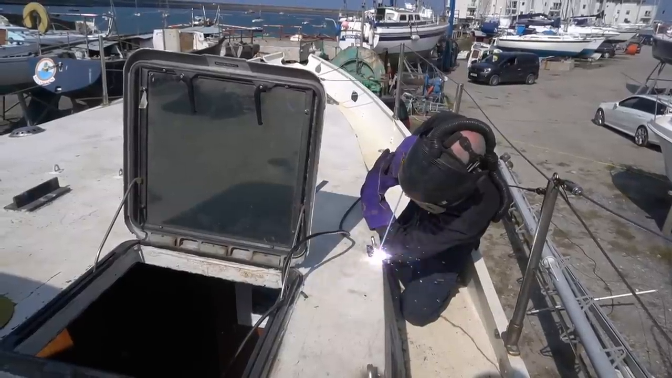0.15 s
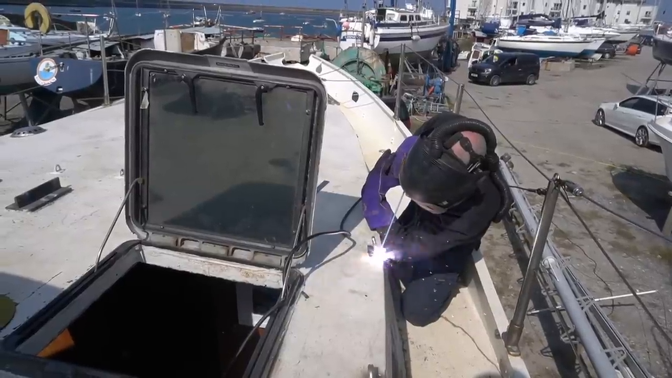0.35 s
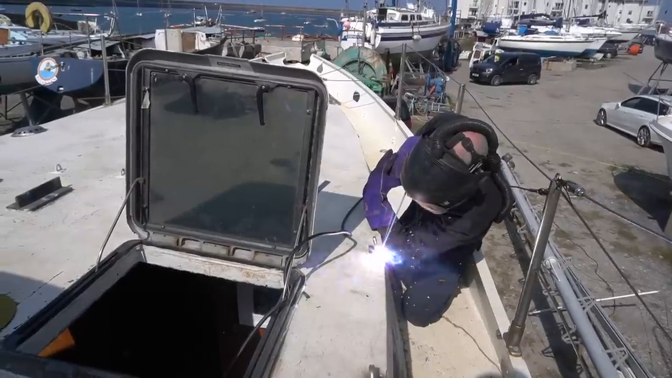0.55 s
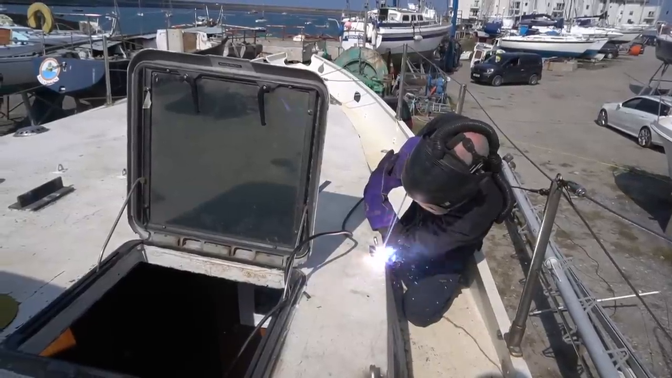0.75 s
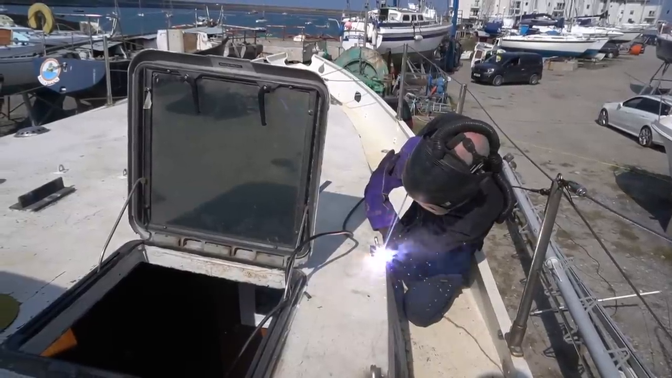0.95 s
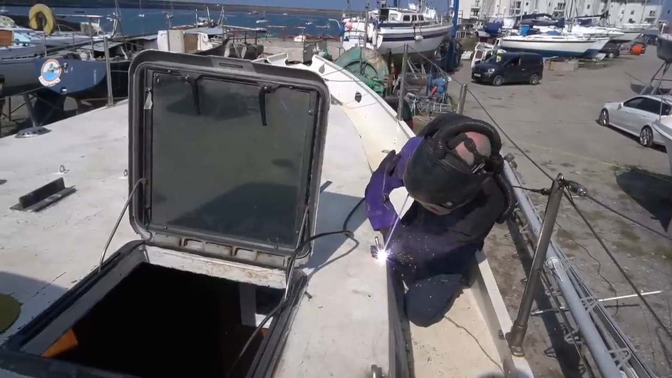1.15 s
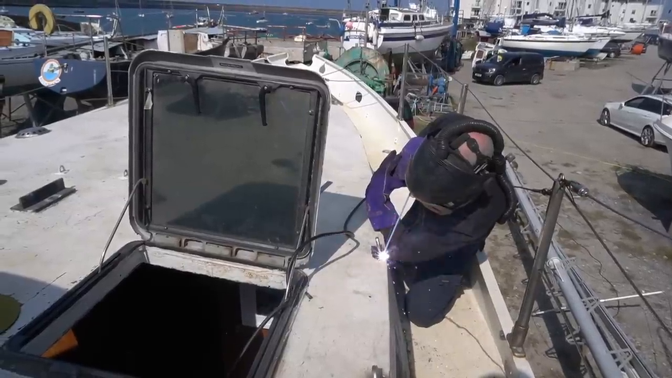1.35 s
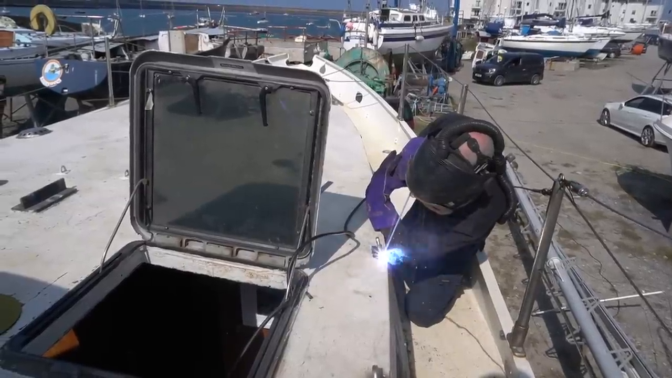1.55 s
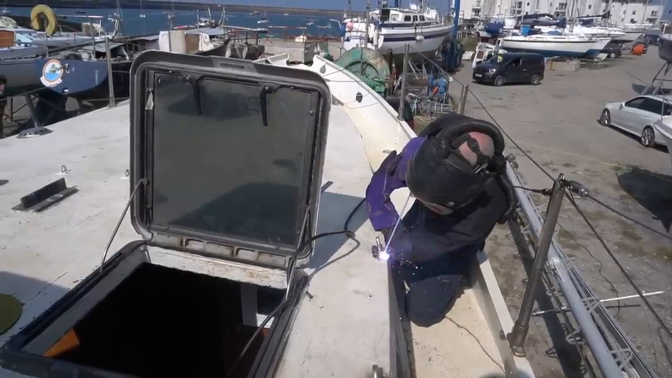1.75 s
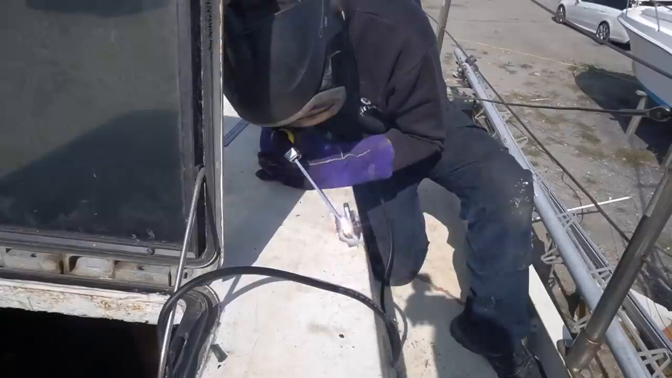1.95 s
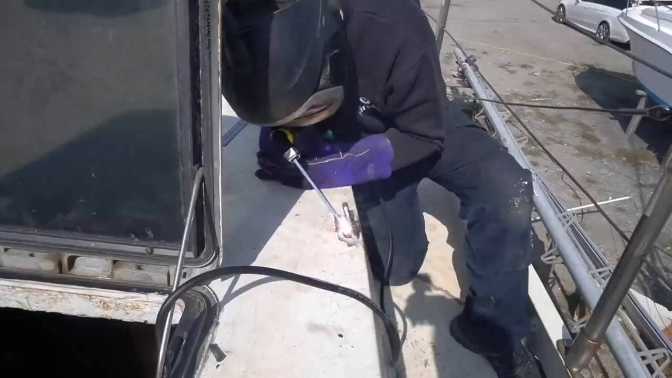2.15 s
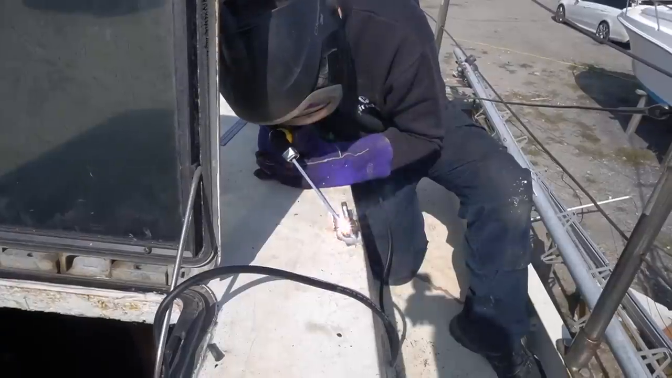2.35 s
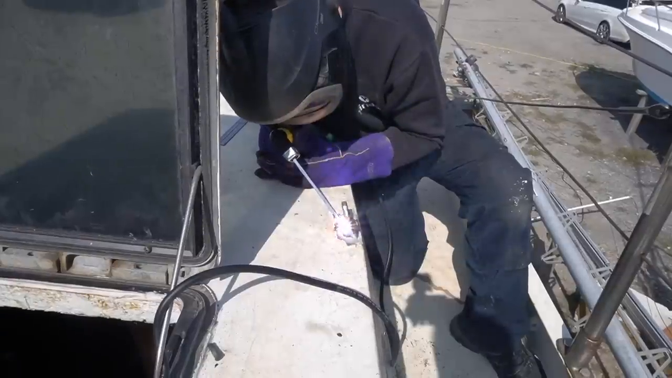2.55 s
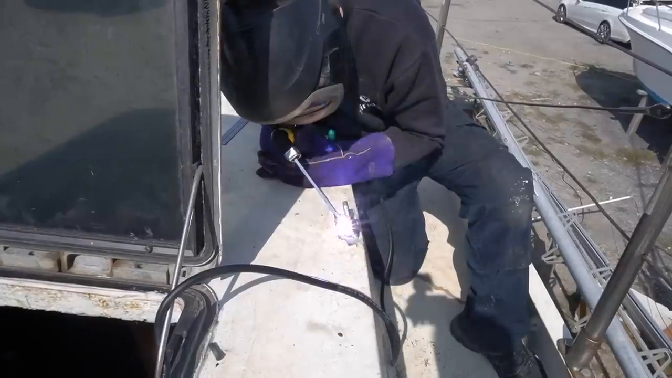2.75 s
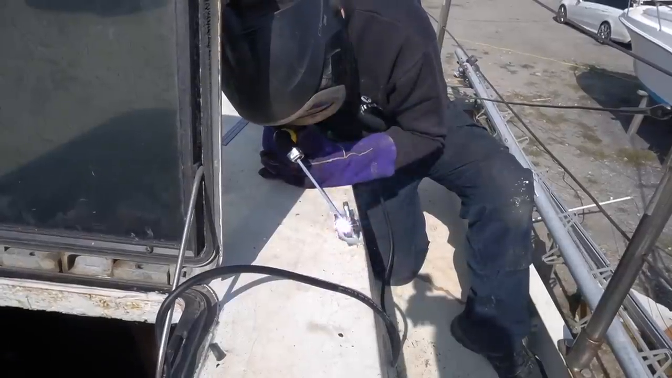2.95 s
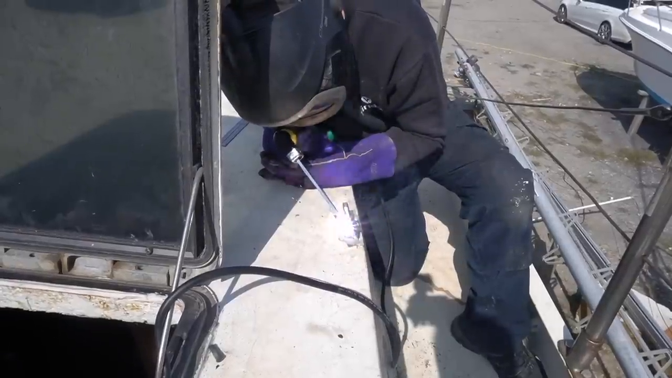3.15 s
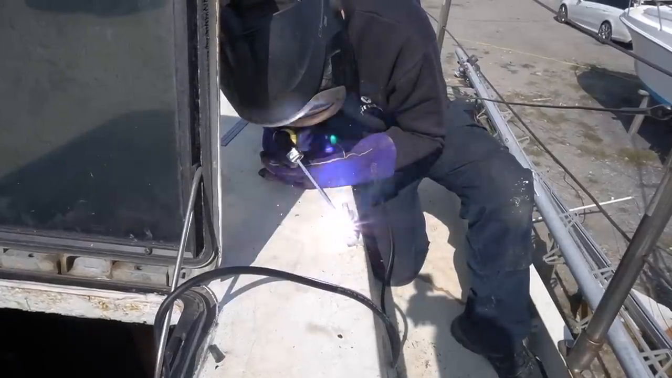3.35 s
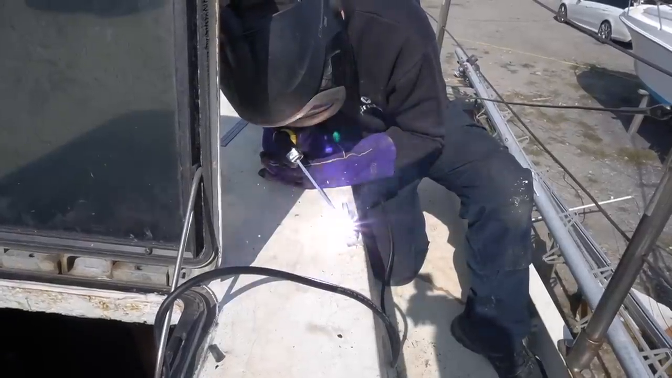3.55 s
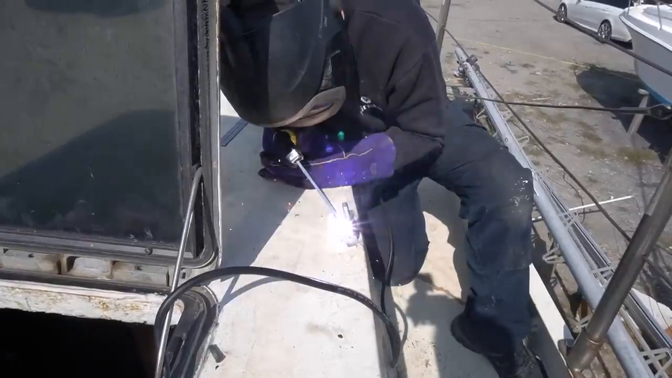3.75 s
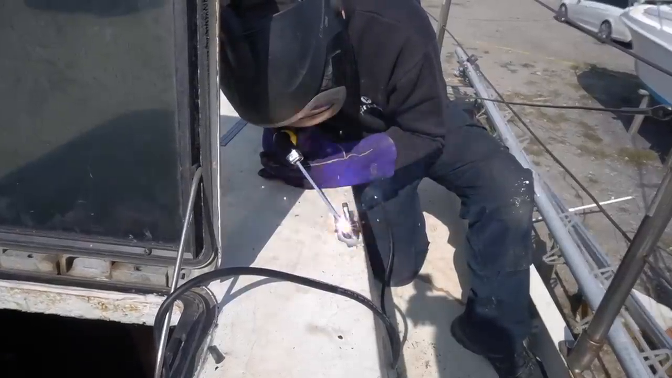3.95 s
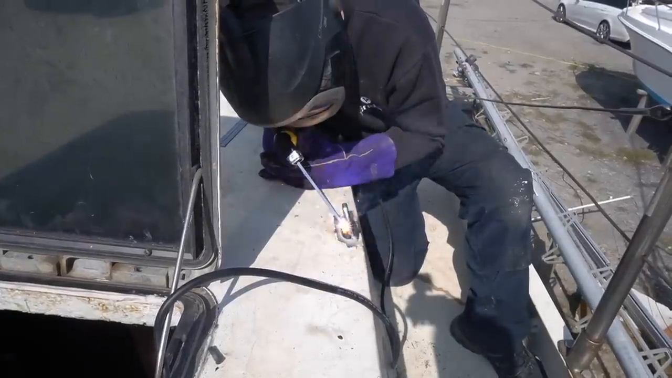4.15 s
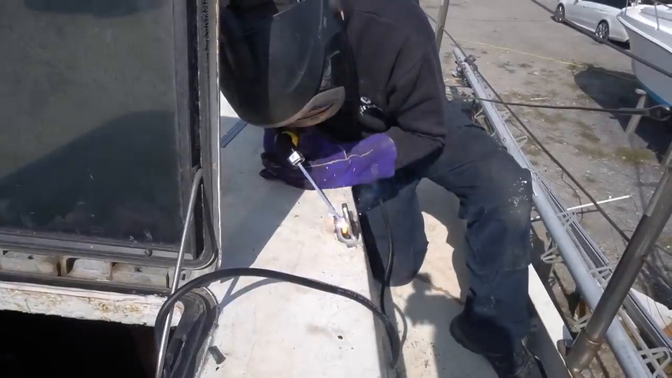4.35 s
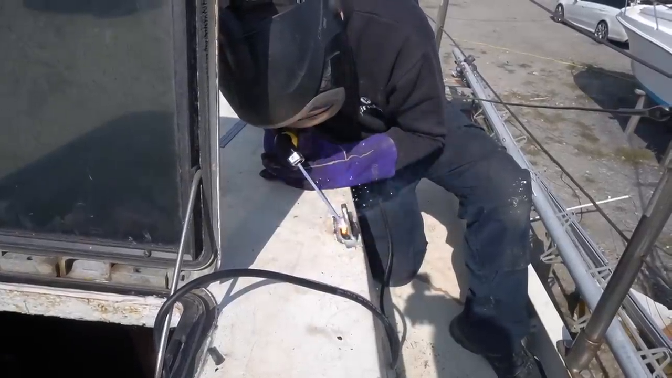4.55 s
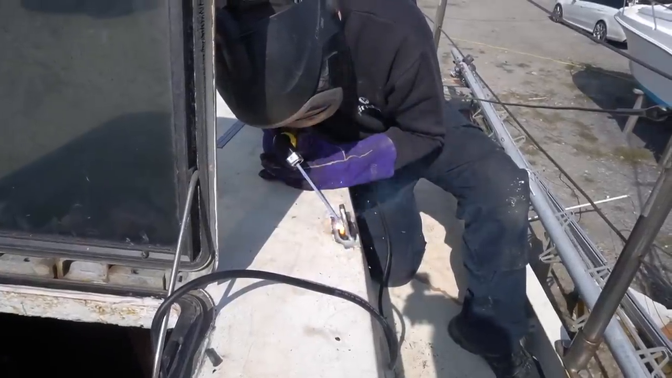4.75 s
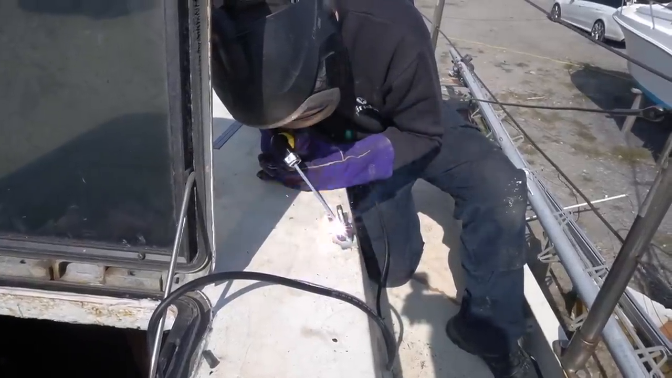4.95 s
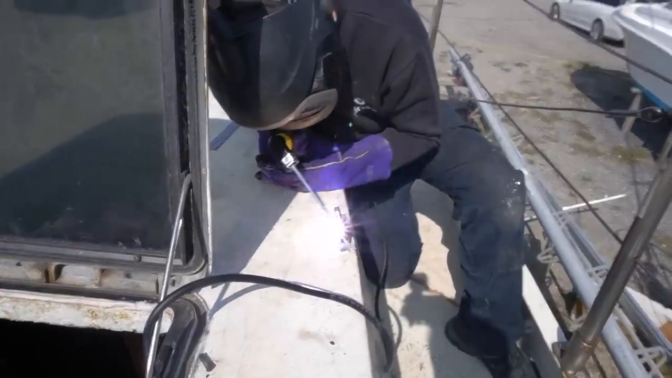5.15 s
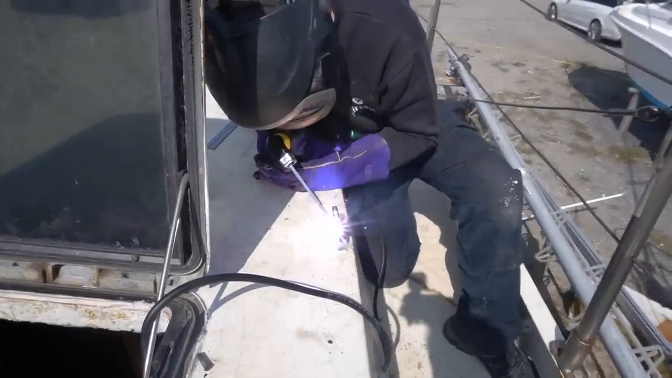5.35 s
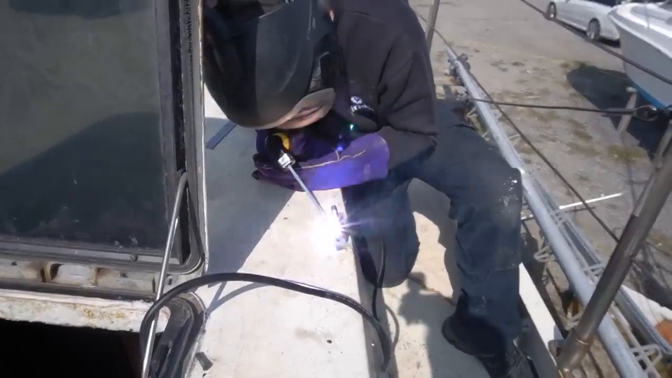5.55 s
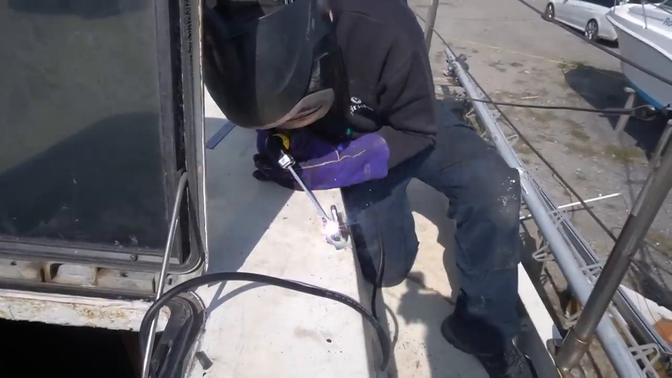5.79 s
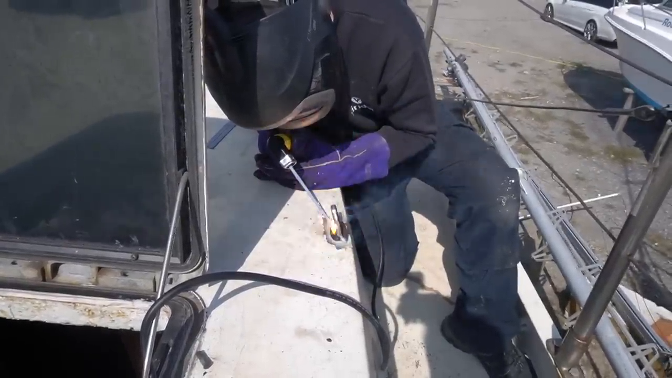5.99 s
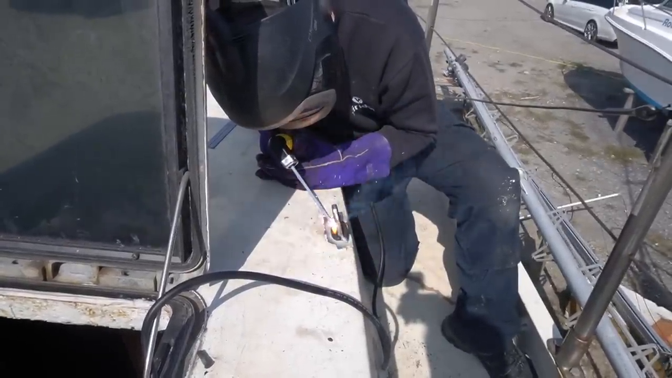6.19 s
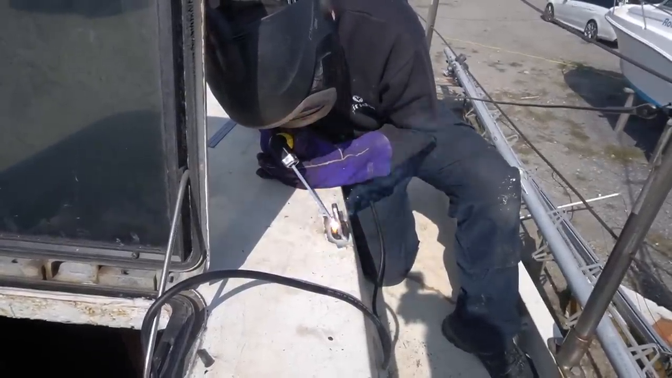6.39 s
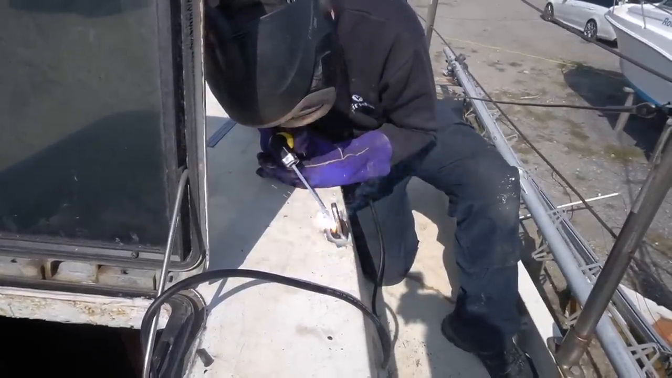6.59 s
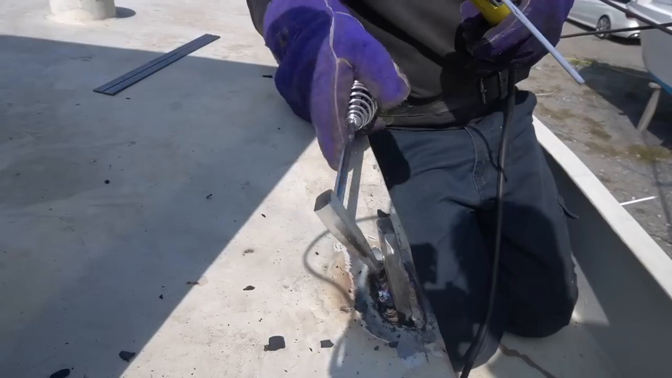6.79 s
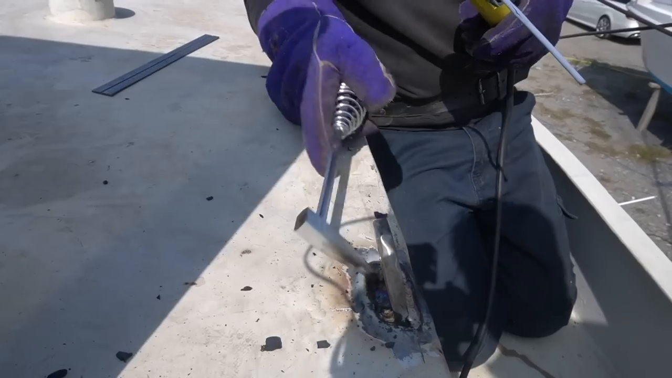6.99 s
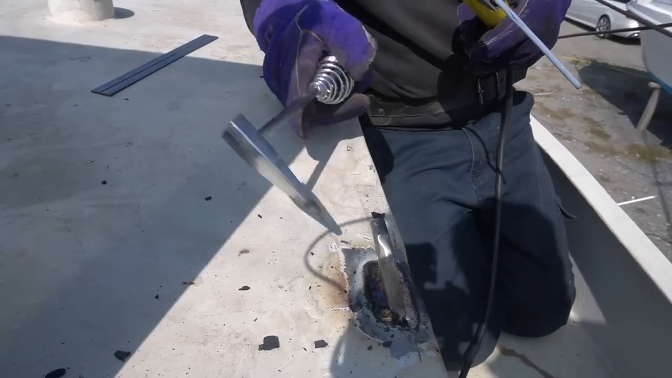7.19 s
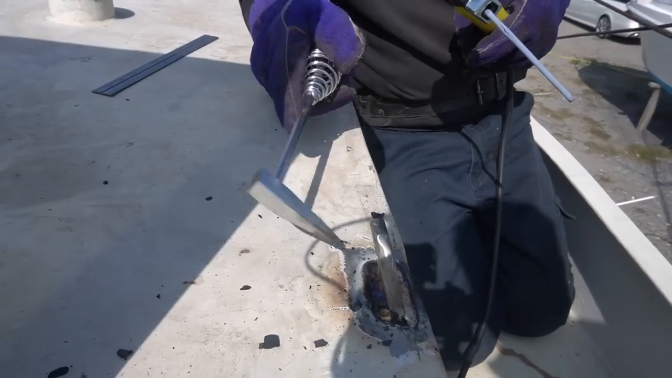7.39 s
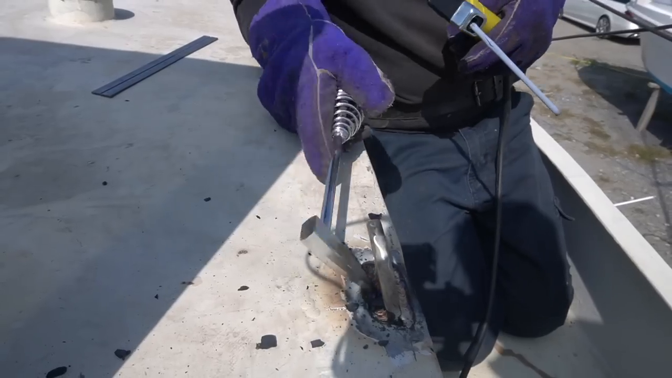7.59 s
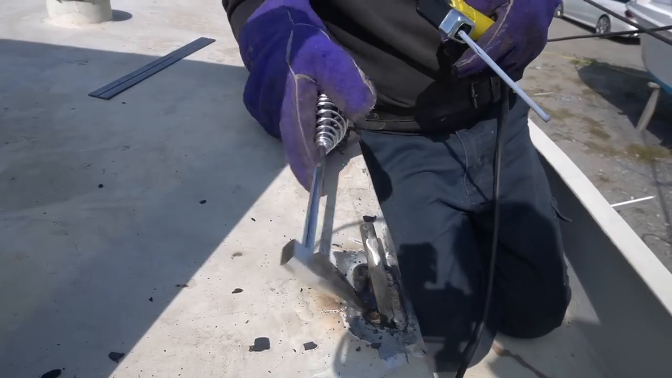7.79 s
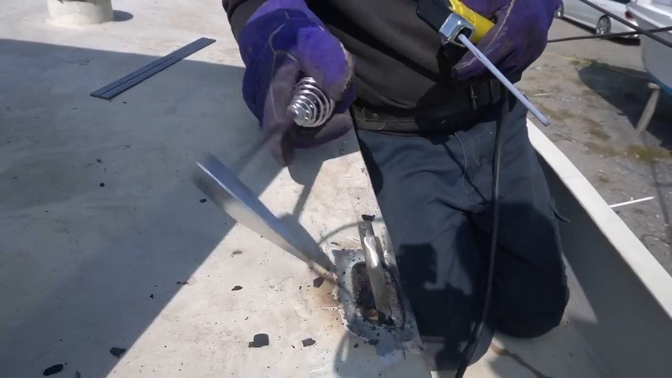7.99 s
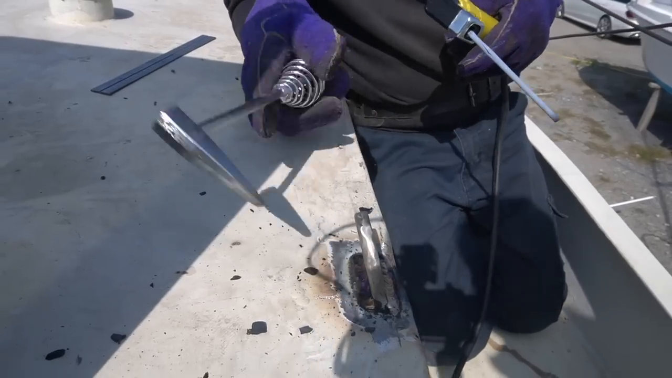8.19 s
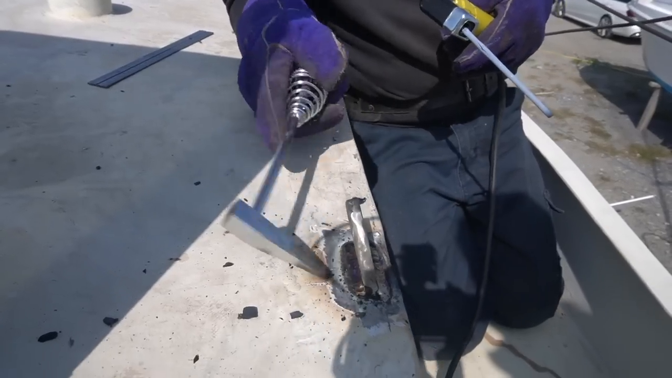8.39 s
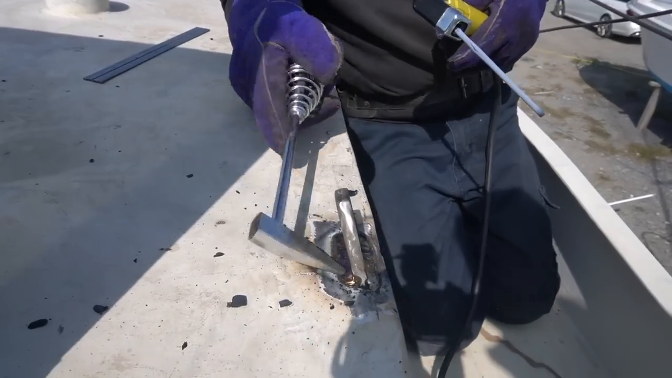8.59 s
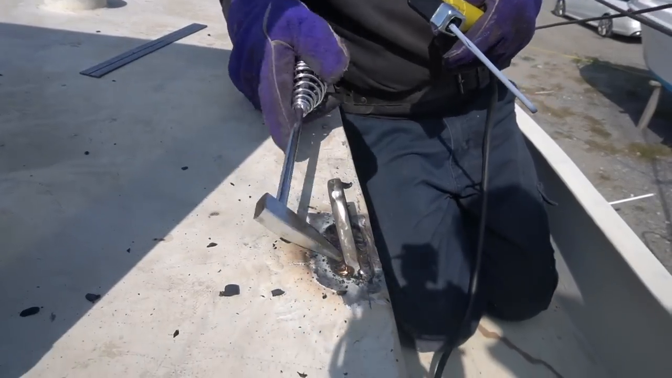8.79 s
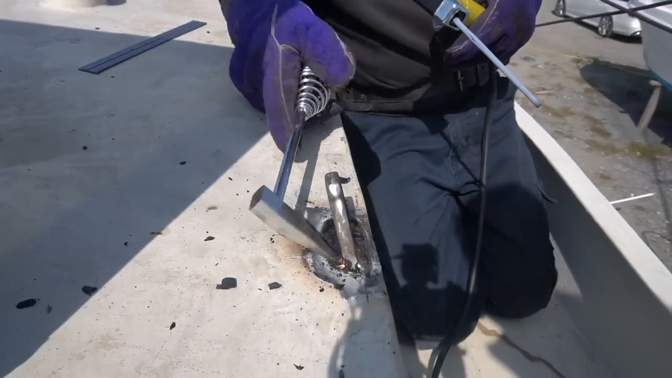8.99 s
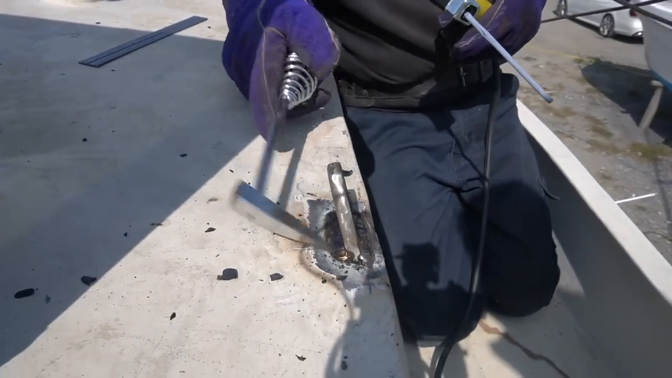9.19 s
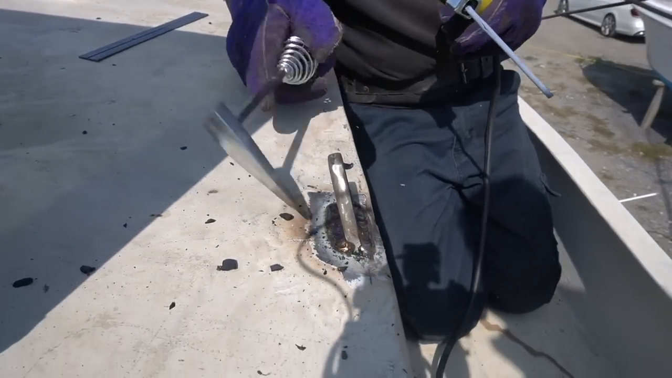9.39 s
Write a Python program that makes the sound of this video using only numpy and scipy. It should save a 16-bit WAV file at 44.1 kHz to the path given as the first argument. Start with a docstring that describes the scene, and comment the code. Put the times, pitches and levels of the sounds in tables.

```python
"""A boatyard: a steel eye is stick-welded to a deck, heard from a few steps away in a breeze, then close by.
The arc fries as noise and random sparks, spits short noise bursts and puffs gas over the fan's wavering tones.
Then a chipping hammer knocks the slag off: noise crashes, and decaying noise bands and sines boom as the deck.
Slag ticks and patters and the pick rings between the blows.
The work lies to the right of two spaced microphones, whose input rounds off the loudest peaks."""
import sys
import numpy as np
from scipy import signal
from scipy.fft import rfft, irfft
from scipy.io import wavfile
from scipy.ndimage import uniform_filter1d

SR = 44100
rng = np.random.default_rng(int(sys.argv[2]) if len(sys.argv) > 2 else 0)


def put_to_file(sound):
    """Save the sound as 16-bit audio at rate SR, in the file named by the first command-line argument."""
    columns = np.atleast_2d(sound).T  # one column per channel
    safe = np.clip(columns, -1, 1)
    whole_steps = np.round(safe * 32767)
    wavfile.write(sys.argv[1], SR, whole_steps.astype(np.int16))


N = 416304
TIME = np.arange(N) / SR
# the scene changes from the far place to the near one; the welding stops (s)
NEAR_S, ARC_END_S = 1.86, 6.712

# Strength of the arc as the hand feeds the rod; it dips where the rod nearly sticks.
# Each row: time in seconds, relative level in dB.
ARC_STRENGTH = [(0.0, -28), (0.27, -26), (0.34, -32), (0.41, -25), (0.5, -28), (0.94, -24), (0.99, -27.4),
                (1.37, -27), (1.55, -30.5), (1.6, -26.5), (1.86, -33.5), (1.9, -29.5), (2.44, -29),
                (3.34, -30), (3.43, -22), (3.5, -26), (3.55, -23), (3.81, -29.5), (4.39, -28.5),
                (4.44, -30), (4.55, -27.1), (4.6, -32), (4.76, -26), (4.85, -31.5), (5.01, -24.5),
                (5.06, -28.5), (5.38, -28.5), (5.47, -25.5), (5.52, -33), (5.59, -25), (5.86, -30.5),
                (6.67, -28.5)]
# The biggest drops of metal, which short the arc and burst. Each row: time in seconds, relative energy in dB.
BIG_DROPS = [(0.1357, 7.5), (0.1999, 7.5), (0.3028, 11.5), (0.4721, 6), (0.594, 7), (0.693, 8), (0.7042, 6),
             (0.724, 2), (1.0554, 7), (1.426, 9), (1.437, 9.5), (1.6137, 3), (1.779, 9), (1.804, 7),
             (1.884, 12.5), (2.1768, 5.5), (2.3898, 6), (2.491, 3), (2.6807, 8.5), (3.0265, 6.5),
             (3.0372, 9), (3.197, 13), (3.2703, 8), (3.2818, 12.5), (3.3016, 10), (3.5653, 9.5),
             (3.6354, -3), (3.6488, 6), (3.9697, 9.5), (4.2594, 11.5), (4.442, 8.5), (4.5336, 7),
             (4.6543, 9.5), (4.6666, 9.5), (4.8518, 8), (5.0306, 13), (5.2056, 10.5), (5.3402, 6),
             (5.4867, 9.5), (5.8463, 6), (5.9409, 5), (6.0727, 11.5), (6.5208, 5), (6.609, 5), (6.6497, 6)]
# Hammer blows, the first a soft knock on the deck. Each row: start in seconds, boom gain in dB,
# clank gain in dB, clash gain in dB, pitch of the struck spot in Hz.
BLOWS = [(6.708, -9.5, -27, -25, 3400), (6.8273, 5, 8, 7.5, 3400), (7.06, 2.5, 4.5, 3, 3430),
         (7.297, 0.5, 4.5, 5, 4050), (7.6371, -5, -3.5, -4.5, 3290), (7.853, -5, 0.5, 0, 4000),
         (8.091, -0.5, 1, -4.5, 4430), (8.3398, 0.5, 4, 3.5, 2580), (8.571, -2.5, -3, -6.5, 2990),
         (8.7982, -1.5, -1, -5, 3180), (9.031, -2, 1, -0.5, 4080), (9.2624, -0.5, 2, 4, 4280)]


def from_db(db):
    """Decibels to amplitude."""
    return 10 ** (np.asarray(db) / 20)


def rms_one(x):
    """Scale to rms 1."""
    return x / np.sqrt(np.mean(x ** 2) + 1e-20)


def in_time(rows):
    """Rows of (s, value) as a curve over the whole scene."""
    return np.interp(TIME, *np.transpose(rows))


def at_hz(points, hz):
    """Each column of a spectrum, read on a log-frequency axis."""
    knots, *columns = np.transpose(points)
    return np.array([np.interp(np.log(hz + 1e-9), np.log(knots), c) for c in columns])


def between(start, end):
    """A gate with 6 ms ramps."""
    opening = np.clip((TIME - start) / .006, 0, 1)
    closing = np.clip((end - TIME) / .006, 0, 1)
    return opening * closing


def drift(rate_hz):
    """Smooth chance with spread 1: noise through a two-pole lowpass, made at a twentieth of the sample rate."""
    pole = np.exp(-40 * np.pi * rate_hz / SR)
    raw = rng.standard_normal(N // 20 + 2002)
    # the filter's first 2000 steps are left out while it settles
    slow = signal.lfilter([1], [1, -2 * pole, pole * pole], raw)[2000:]
    return np.interp(np.arange(N) / 20, np.arange(len(slow)), rms_one(slow))


def noise(spectrum, size):
    """Coloured stereo noise, independent left and right, rms 1 overall."""
    hz = np.fft.rfftfreq(size, 1 / SR)
    white = rfft(rng.standard_normal((2, size)))
    return rms_one(irfft(white * from_db(at_hz(spectrum, hz)), size))


def band(x, low_hz, high_hz):
    """Keep a band of frequencies."""
    return signal.sosfilt(signal.butter(2, [low_hz, high_hz], "band", fs=SR, output="sos"), x)


def colour(x, spectrum, weight=0.97, size=1024):
    """A causal (minimum-phase) filter with the given spectrum times a weight."""
    gain = weight * from_db(at_hz(spectrum, np.fft.rfftfreq(size, 1 / SR)))
    # folding the cepstrum onto positive time gives minimum phase
    cepstrum = irfft(np.log(gain))
    cepstrum[:, 1:size // 2] *= 2
    cepstrum[:, size // 2 + 1:] = 0
    response = irfft(np.exp(rfft(cepstrum)))
    return signal.oaconvolve(x, response, axes=1)[:, :x.shape[1]]


def left_late(x, lag_ms):
    """Sound from the right reaches the left microphone later."""
    lag = round(lag_ms * SR / 1000)
    return np.array([np.pad(x[0], (lag, 0))[:x.shape[1]], x[1]])


def add(out, sound, s):
    """Mix a sound in at s seconds."""
    at = round(s * SR)
    out[:, at:at + sound.shape[1]] += sound[:, :N - at]


def clicks(rows):
    """One-sample impulses from rows of (s, level dB)."""
    out = np.zeros(N)
    for s, db in rows:
        out[round(s * SR)] += from_db(db)
    return out


def bursts(rows, t60, snap_db, swell_ms, spread=0.45, size=4000):
    """Each burst swells, snaps, and spits for a time of its own; right-channel energy as in the rows."""
    t = np.arange(size) / SR - .01
    out = np.zeros((2, N))
    snap = np.argmin(np.abs(t))
    for s, db in rows:
        swell_stretch, decay_stretch = np.exp(spread * rng.standard_normal(2))
        swell = np.exp(np.minimum(t, 0) * 1000 / (swell_ms * swell_stretch))
        decay = from_db(-60 * np.maximum(t, 0) / (t60 * decay_stretch))
        spit = rng.standard_normal((2, size)) * swell * decay
        spit /= np.linalg.norm(spit[1])
        # the snap is a single sample, its level varied by chance
        spit[:, snap] = from_db(snap_db + rng.normal(0, 3.3))
        add(out, from_db(db) * spit / np.linalg.norm(spit[1]), s + t[0])
    return out


def over_deck(x, spectrum, lag_ms, scatter_db, scatter_t60, echo_db, echo_t60, size=4096):
    """A snap arrives directly, with scatter from hatch, mask and deck and a longer echo tail."""
    t = np.arange(size) / SR
    path = np.zeros((2, size))
    path[:, 0] = 1
    for db, t60 in ((scatter_db, scatter_t60), (echo_db, echo_t60)):
        tail = rng.standard_normal((2, size)) * from_db(-60 * t / t60) * (1 - np.exp(-t / .0004))
        path += from_db(db) * tail / np.linalg.norm(tail, axis=1, keepdims=True)
    # reflections add only fine ripple; the broad colour is that of the spectrum
    broad = uniform_filter1d(np.abs(rfft(path)) ** 2, size=32, axis=1)[:, ::4]
    path = colour(path, spectrum, weight=broad ** -.5)
    path = left_late(path / np.linalg.norm(path[1]), lag_ms)
    return signal.oaconvolve(np.atleast_2d(x), path, axes=1)[:, :N]


def arc_level(wander_db=0.68):
    """The hand sets the level in dB, a little unsteadily; the arc flares as it strikes again at each big drop."""
    flare_db, attack_s, hold_s, release_s = 2, 0.0056, 0.017, 0.11
    # the rise ends at the moment of the burst
    corners_s = np.cumsum([-attack_s, attack_s, hold_s, release_s])
    flare = np.max([np.interp(TIME, s + corners_s, [0, 1, 1, 0]) for s, _ in BIG_DROPS], axis=0)
    return in_time(ARC_STRENGTH) + flare_db * flare + wander_db * drift(18)


def droplets(count=60, over_arc_db=29):
    """Small drops leave the rod at random, stronger with the arc: rows of (s, relative energy dB)."""
    s = .02 + rng.random(count) * (ARC_END_S - .02)
    return list(zip(s, np.interp(s, *np.transpose(ARC_STRENGTH)) + over_arc_db))


def frying(sparks_per_s=1100, size_db=4.5, sputter_db=2.5, flutter_db=1.22):
    """Tiny discharges fry over a hiss, both in spurts, while the length of the arc tilts their tone."""
    # A longer arc sounds throatier. Each row: time in seconds, dB added to the lows and taken from the highs.
    throat = [(0, -0.5), (0.65, 3.5), (1.1, 4.5), (1.33, -1.5), (1.8, -0.5), (2.33, 0), (2.95, -2.5),
              (3.7, 1.7), (3.85, -1.1), (4.8, -1.5), (5.5, 4.5), (5.75, -1), (6.7, 0.5)]
    spurts = rms_one(from_db(sputter_db * np.minimum(drift(96), 2)))
    burn = from_db(arc_level()) * spurts
    sizes = from_db(size_db * np.minimum(rng.exponential(1, N), 3.5)) * rng.choice([-1, 1], N)
    sparks = rms_one(sizes * (rng.random(N) < sparks_per_s / SR))
    # one hiss is common to both sides, a softer one differs left and right
    hiss = from_db(-4.0) * rng.standard_normal(N) + from_db(-7.0) * rng.standard_normal((2, N))
    fry = burn * (from_db(-3.0) * sparks + hiss)
    lows = signal.sosfilt(signal.butter(1, 4200, fs=SR, output="sos"), fry)
    tilt = from_db(in_time(throat) + flutter_db * drift(14))
    return lows * tilt + (fry - lows) / tilt


def arc(pop_db=-3.0, puff_db=37.5, eye_hz=3500, eye_db=-7.0):
    """Over the frying, drops burst and gas puffs from the pool; the eye resonates and the deck scatters it all."""
    # Dull puffs of gas from the pool. Each row: time in seconds, relative energy in dB.
    puffs = [(0.578, -24), (2.316, -27), (2.623, -25.5), (4.461, -27), (4.664, -21.5), (5.028, -22.5),
             (5.205, -28), (6.088, -22.5), (6.647, -20.5)]
    # Colour of the arc from the far and from the near place. Each row: frequency in Hz, left dB, right dB.
    far_colour = [(300, -15.5, -19.5), (940, -15, -17), (1320, -15, -12.5), (2110, -19, -12.5),
                  (2260, -16, -3.5), (3220, -10, -9.5), (3300, -11.5, -2.5), (4830, -13.5, -4.5),
                  (5830, -8.5, -7.5), (7400, -14, -3), (8330, -9, -1.5), (9460, -18, -9.5),
                  (10900, -14, -8.5), (14000, -55, -15.5), (15300, -30, -21)]
    near_colour = [(304, -19.5, -23), (910, -17.5, -13.5), (1405, -13, -15), (1920, -6, 0.5),
                   (2540, -14, -7), (2540, -0.5, -3), (3640, -27, -1), (3690, -8.5, -2), (5240, -6, -2),
                   (6260, -5.5, 0), (6500, -10, -10), (7130, -3.5, -1.5), (7780, -8.5, -6),
                   (10380, -13, -9.5), (13250, -19.5, -18), (16400, -41, -24.5)]
    big = bursts(BIG_DROPS, t60=0.006, snap_db=-1.5, swell_ms=0.42)
    small = bursts(droplets(), t60=0.009, snap_db=2.0, swell_ms=0.75)
    # a bursting drop is sharper than the frying
    pops = from_db(pop_db) * colour(big + small, [(1500, -3), (5000, 0), (13000, 3.5)])
    gas = from_db(puff_db) * band(bursts(puffs, t60=0.056, snap_db=-19.0, swell_ms=1.8), 310, 1360)
    source = frying() + pops + gas
    # the steel eye under the arc rings along
    source = source + from_db(eye_db) * signal.lfilter(*signal.iirpeak(eye_hz, 12.0, fs=SR), source)
    far = over_deck(source * between(0, NEAR_S), far_colour, lag_ms=1.347,
                    scatter_db=-7.5, scatter_t60=0.025, echo_db=-13.5, echo_t60=0.067)
    near = over_deck(source * between(NEAR_S, ARC_END_S), near_colour, lag_ms=1.995,
                     scatter_db=-4.5, scatter_t60=0.012, echo_db=-13.5, echo_t60=0.23)
    return from_db(1) * far + from_db(1.15) * near


def breeze(buffet_db=2.5):
    """Lumpy low rumble at the far place, easing off, with a few short low thumps and gusts."""
    # Tone of the rumble. Each row: frequency in Hz, relative level in dB.
    rumble_colour = [(15, -41), (25, -24), (70, -1.5), (141, -1), (352, -14.5), (518, -16), (600, -21),
                     (780, -21), (1320, -120)]
    # Short low thumps and gusts; the first is a thump as the sound starts.
    # Each row: time in seconds, relative peak in dB, half length in seconds (to 1/e of the peak).
    swell_rows = [(0.004, -21.5, 0.011), (0.32, -29.5, 0.025), (0.54, -39, 0.02), (1.055, -39, 0.02),
                  (1.124, -32.5, 0.022)]
    start_db, easing_db_per_s = -36, 5
    lull_s, lull_db_per_s = 1.66, 36
    steady_db = start_db - easing_db_per_s * TIME - lull_db_per_s * np.maximum(TIME - lull_s, 0)
    swells = np.zeros(N)
    for s, db, half_s in swell_rows:
        swells += from_db(db) * np.exp(-np.minimum(np.abs(TIME - s) / half_s, 6) ** 2)
    strength = np.hypot(from_db(steady_db + buffet_db * drift(17)), swells)
    return strength * noise(rumble_colour, N) * from_db([[1.5], [-1.5]]) * between(0, NEAR_S)


def surroundings(yard_db=-47.0, late_db=-40.5, waver=0.00097):
    """Coloured yard noise throughout; during the welding, sines of slightly wavering pitch for the cooling fan."""
    # Yard noise behind the welding and behind the chipping. Each row: frequency in Hz, relative level in dB.
    yard_welding = [(25, -15), (70, -2.5), (140, 3), (280, -8.5), (550, 1), (900, -10), (2000, -3.5),
                    (6000, -29)]
    yard_chipping = [(25, -28), (70, -4), (130, 0), (250, -7.5), (380, -9), (520, -7), (750, -9.5),
                     (1300, -16.5), (3000, -23), (6000, -32), (14000, -56)]
    # Tones of the welder's fan. Each row: frequency in Hz, relative level in dB.
    fan_tones = [(647, -51), (1294, -62.5)]
    phase_per_hz = 2 * np.pi * np.cumsum(1 + waver * drift(8.7)) / SR
    fan = sum(from_db(db) * np.sqrt(2) * np.sin(hz * phase_per_hz) for hz, db in fan_tones)
    # a little to the left, its level unsteady
    fan = fan * from_db([[2.5], [-3.0]]) * from_db(1.5 * drift(4))
    welding = fan + from_db(yard_db) * noise(yard_welding, N)
    chipping = from_db(late_db) * noise(yard_chipping, N)
    return between(0, ARC_END_S) * welding + (TIME > ARC_END_S) * chipping


def deck_ring(t, swell_cycles=2.6):
    """Countless plate modes die band by band; the slow low bending waves take longer to build up."""
    # Dense ringing of the deck. Each row: frequency in Hz, left dB, right dB.
    ring_colour = [(40, -25, -34), (115, -6.5, -4.5), (232, -5.5, -2.5), (483, -3, -7.5), (784, -6.5, -6.5),
                   (1160, -5.5, -6.5), (2240, -13.5, -13.5), (2750, -12, -4.5), (3500, -10.5, -7.5),
                   (4300, -13.5, -11.5), (6280, -21, -22), (8900, -37, -37), (14000, -48, -45)]
    # Its decay. Each row: frequency in Hz, time to fall 60 dB in seconds.
    ring_t60 = [(60, 0.54), (160, 0.35), (420, 0.33), (1100, 0.18), (2900, 0.2), (7700, 0.21), (14000, 0.2)]
    centres = np.geomspace(40, 16000, 18)
    hz = np.fft.rfftfreq(len(t), 1 / SR)
    field = rfft(noise(ring_colour, len(t)))
    out = 0
    for centre, pick in zip(centres, np.eye(len(centres))):
        # overlapping triangular bands whose powers add to one
        part = irfft(field * np.sqrt(np.interp(hz, centres, pick)), len(t))
        decay = from_db(-60 * t / at_hz(ring_t60, centre))
        out = out + part * decay * (1 - np.exp(-t * centre / swell_cycles))
    return out


def hammer(deck_db=-9.5, clash_db=1.0, modes_db=0.5, spot_db=-4.5, crush_db=-15.0, size=24000):
    """Each blow crashes on the weld and rings the deck, a little differently wherever the pick lands."""
    # The crash of steel on steel. Each row: frequency in Hz, left dB, right dB.
    crash_colour = [(70, -44, -37.5), (300, -33, -3), (1000, -7, -5.5), (2000, -7, 1.5), (3300, 3, 6.5),
                    (4600, -0.5, 4), (8000, -14.5, -12), (10800, -39.5, -6.5), (15000, -28, -19)]
    # Clear modes of deck and eye. Each row: frequency in Hz, left dB, right dB, 60 dB decay in seconds.
    steel_modes = [(197, -27, -21.5, 0.38), (243.7, -31, -20.5, 0.52), (322.7, -26, -27, .3),
                   (434, -23, -22, 0.27), (474.4, -19, -22.5, 0.36), (539, -31, -31, 0.29),
                   (624, -22, -24.5, 0.33), (923, -21, -22.5, 0.2), (1056, -13.5, -33, 0.14),
                   (1200, -21, -22.5, 0.18), (1378, -24, -21, 0.16), (1546, -23.5, -19.5, 0.11),
                   (2610, -27, -20, 0.18), (3109, -26, -24, 0.19), (3490, -21, -18, 0.19)]
    grind_s, clash_t60, spot_t60 = 0.0034, 0.023, 0.034
    # the pick rebounds at once and touches the weld again
    rebound_s, rebound_db, rebound_t60 = 0.009, -6.5, 0.016
    # share of the deck's ring common to all blows; spread of the mode levels from blow to blow (dB)
    alike, vary_db = 0.65, 3.5
    t, out = np.arange(size) / SR, np.zeros((2, N))
    hz, left_db, right_db, t60 = np.transpose(steel_modes)[:, :, None]
    swell = 1 - np.exp(-t * hz / 0.98)
    modes = from_db(-60 * t / t60) * swell * np.exp(2j * np.pi * hz * t)
    levels_db = np.hstack([left_db, right_db]).T
    same = deck_ring(t)
    for s, boom_db, clank_db, bright_db, spot_hz in BLOWS:
        strengths = from_db(levels_db + rng.normal(0, vary_db, len(hz)))
        strengths = strengths * np.exp(.6j * rng.standard_normal((2, len(hz))))
        plate = np.sqrt(alike) * same + np.sqrt(1 - alike) * deck_ring(t)
        # the pick grinds through the slag for a moment before the crash dies
        crash = from_db(-60 * np.maximum(t - grind_s, 0) / clash_t60)
        again = t - rebound_s * rng.uniform(.8, 1.2)
        rebound = (again > 0) * from_db(rebound_db - 60 * np.abs(again) / rebound_t60)
        clash = noise(crash_colour, size) * np.hypot(crash, rebound)
        # the struck spot pings, weaker on the left
        spot = np.sin(2 * np.pi * spot_hz * t) * from_db(spot_db - 60 * t / spot_t60) * from_db([[-4], [0]])
        body = from_db(deck_db) * plate + from_db(modes_db) * (strengths @ modes).imag
        blow = left_late(body + from_db(clash_db) * clash + spot, lag_ms=1.9)
        add(out, colour(blow, [(350, boom_db), (1200, clank_db), (3500, bright_db)]), s)
    # the crust gives way just before steel meets steel
    crust = bursts([(s - .002, db) for s, _, _, db, _ in BLOWS], t60=0.033, snap_db=-16.0, swell_ms=5.5)
    return out + from_db(crush_db) * left_late(band(crust, 1500, 6700), lag_ms=1.9)


def slag(crumbs_per_s=45, crumb_db=-29.5, shiver_db=3.5, size=16000):
    """Bright contacts and blows set the pick ringing as decaying sines; crumbs of slag patter as random clicks."""
    # The pick bounces and large bits of slag land. Each row: time in seconds, relative level in dB.
    contacts = [(6.8263, 1), (7.032, -10), (7.098, 3), (7.16, -3.5), (7.378, -6), (7.492, -14.5),
                (7.6712, 6.5), (7.9704, -13), (7.98, -16), (8.1038, 16), (8.2063, -11), (8.279, -15),
                (8.313, -18), (8.6193, 1.5), (8.854, -7), (8.898, -10.5), (8.9517, -22), (9.078, 4)]
    # Thin ring of the bouncing pick. Each row: frequency in Hz, relative level in dB, 60 dB decay in seconds.
    pick_modes = [(11050, -40.5, 0.17), (11100, -43, .15), (12600, -58, .16)]
    # Colour of the contacts. Each row: frequency in Hz, left dB, right dB.
    bright = [(497, -20, 4), (1800, -12, 6), (3000, 4, 12.0), (6000, 1.5, 3), (11200, -20, -3.5), (15000, -27, -24)]
    t = np.arange(size) / SR
    ring = sum(from_db(db - 60 * t / t60) * np.sin(2 * np.pi * hz * t) for hz, db, t60 in pick_modes)
    # only the firmer contacts ring the pick, up to a limit
    strikes = clicks([(s, min(db, 3)) for s, db in contacts if db > -10])
    strikes = strikes + clicks([(s, min(db, -3.0)) for s, _, _, db, _ in BLOWS])
    pick = signal.oaconvolve(strikes, ring)[:N] * from_db([[-8], [0]]) * from_db(shiver_db * drift(30))
    crumb_sizes = from_db(crumb_db + 3.5 * rng.standard_normal(N))
    crumbs = (rng.random(N) < crumbs_per_s / SR) * crumb_sizes * (TIME > BLOWS[0][0])
    return pick + over_deck(clicks(contacts) + crumbs, bright, lag_ms=2.2,
                            scatter_db=14.0, scatter_t60=0.016, echo_db=7.0, echo_t60=0.12)


def scuffs(scuff_db=11.0):
    """Brief mid-pitched rubs between the blows: noise bursts in a band."""
    # Short dull scuffs. Each row: time in seconds, relative energy in dB.
    rubs = [(7.03, -15), (7.17, -6), (7.5, -13), (8.215, -14), (8.25, -13), (8.765, -12), (8.875, -7),
            (9.005, -5.5)]
    return from_db(scuff_db) * band(bursts(rubs, t60=0.077, snap_db=-18.0, swell_ms=4.0), 960, 2300)


def scene():
    """Welding, then chipping, in the open yard."""
    return arc() + hammer() + slag() + scuffs() + breeze() + surroundings()


def record(dry, top=0.76, cutoff_hz=15900):
    """The input overloads softly on the loudest peaks; a steep lowpass cuts the extreme treble."""
    clipped = dry / (1 + (dry / top) ** 6) ** (1 / 6)
    return signal.sosfilt(signal.ellip(10, .1, 70, cutoff_hz, fs=SR, output="sos"), clipped)


dry = scene()
out = record(dry)
put_to_file(out)
```